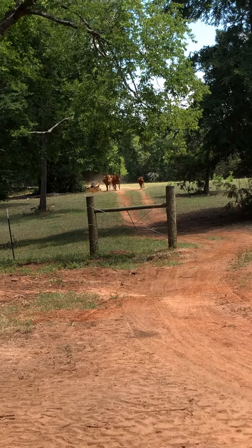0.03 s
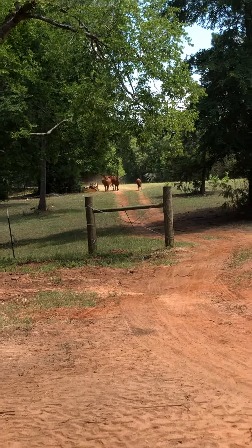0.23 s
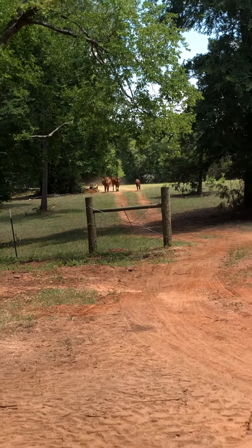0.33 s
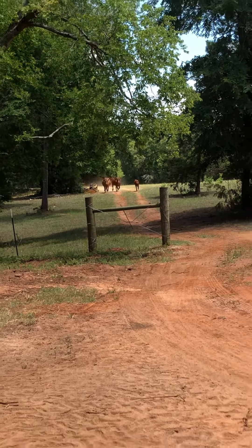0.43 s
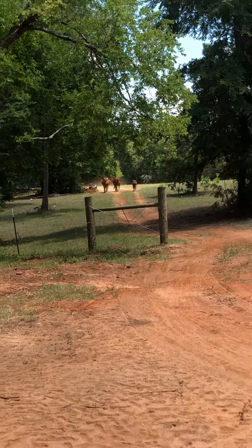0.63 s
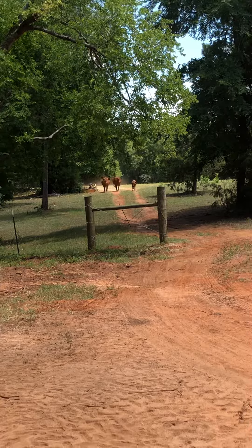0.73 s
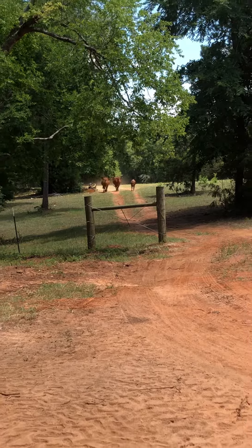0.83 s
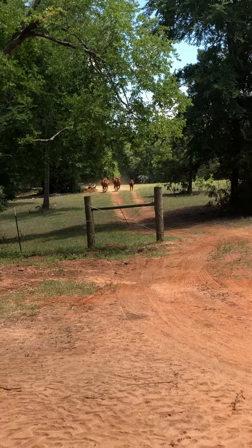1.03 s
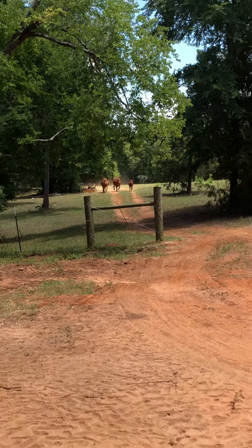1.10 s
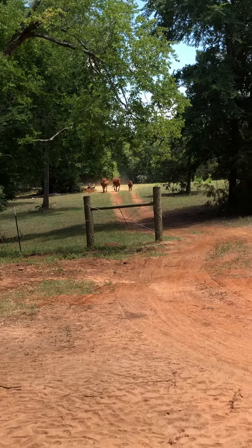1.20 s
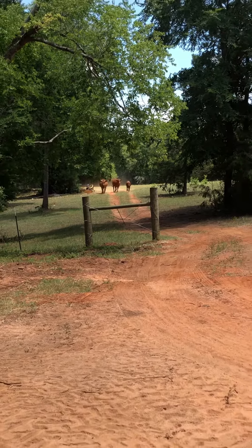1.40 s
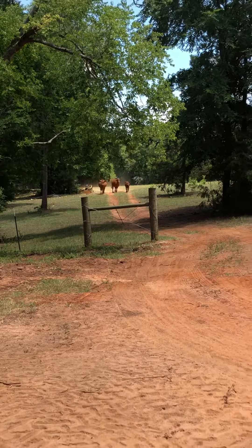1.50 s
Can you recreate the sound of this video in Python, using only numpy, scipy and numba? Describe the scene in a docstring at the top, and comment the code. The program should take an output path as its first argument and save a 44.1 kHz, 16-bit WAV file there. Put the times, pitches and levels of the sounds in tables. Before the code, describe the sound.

A single cow moo opens with a slow throaty rattle, swells and turns hoarse, flips to a thin high tone, then plunges into a short grunt; quiet open pasture, dull tree echoes, faint wind and insects.

```python
"""A slow rattle through a nearly shut mouth opens a cow's one moo: it opens, climbs, turns hoarse,
breaks into a thin falsetto and plunges to a last grunt. Chest voice: pulses and puffs through nose
and throat resonances. Falsetto: a few sine partials plus throat-rung overtones. Grunt: throat noise
and decaying modes. Behind, over dull echoes: dry noise ticks and rustle, filtered-noise wind and
insect hiss, a low hum of sines."""
import sys
import numpy as np
from scipy import signal
from scipy.fft import rfft, irfft
from scipy.io import wavfile
from scipy.ndimage import uniform_filter1d
from numba import njit

SR = 44100
rng = np.random.default_rng(int(sys.argv[2]) if len(sys.argv) > 2 else 0)


def persist_wave(psi):
    """Save psi, clipped to +-1, as 16-bit WAV."""
    counts = np.round(np.clip(psi, -1, 1) * 32767).astype(np.int16)
    wavfile.write(sys.argv[1], SR, np.atleast_2d(counts).T)


N = 68355
T = np.arange(N) / SR


def from_db(db):
    """Amplitude ratio of a level in dB."""
    return 10 ** (np.asarray(db) / 20)


def rms_one(x):
    """Scale to rms 1."""
    return x / np.sqrt(np.mean(x ** 2) + 1e-20)


def in_time(rows):
    """Each column of a curve, at every sample."""
    s, *columns = np.transpose(rows)
    return [np.interp(T, s, c) for c in columns]


def cut(x, hz, kind, order=2):
    """Butterworth filter."""
    safe_hz = np.clip(hz, 10, .45 * SR)
    return signal.sosfilt(signal.butter(order, safe_hz, kind, fs=SR, output="sos"), x + 1e-18)


def noise():
    """White noise of rms about 1."""
    return rng.standard_normal(N)


def drift(hz):
    """Low-passed noise of rms 1, taken after the filter has settled."""
    return rms_one(cut(rng.standard_normal(2 * N), hz, "low")[N:])


def fade(seconds, length_s):
    """Smooth step from 0 to 1, half way where seconds crosses zero."""
    return .5 + .5 * np.tanh(2 * seconds / length_s)


@njit
def two_pole(x, w, r):
    """Two-pole resonator: w is the centre in radians per sample, r the pole radius."""
    y = np.zeros(len(x))
    for i in range(2, len(x)):
        drive = (1 - r * r) / 2 * (x[i] - x[i - 2])
        y[i] = drive + 2 * r * np.cos(w[i]) * y[i - 1] - r * r * y[i - 2]
    return y


def resonate(x, hz, width_hz):
    """Resonance of peak gain 1 whose centre may move."""
    return two_pole(x, 2 * np.pi * hz / SR * np.ones(N), np.exp(-np.pi * width_hz / SR))


def even(x):
    """Hold the level near rms 1 over a few pulses."""
    power = uniform_filter1d(uniform_filter1d(x * x, size=1000), size=700)
    return x / np.sqrt(np.abs(power) + 1e-14)


# vocal-fold pulse rate: [t/s, f/Hz]
CHEST_PITCH = [(0, 93.75), (.045, 87.77), (.085, 88.42), (.202, 90.72), (.266, 83.96), (.298, 84),
               (.375, 89.9), (.45, 95.75), (.598, 113.1), (.724, 125), (.796, 133.2), (.836, 145.3),
               (.902, 151.1), (.945, 153.4), (.97, 170.4)]
# hoarseness: [t/s, pitch jitter/share, turbulence level/dB re pulses]
HOARSENESS = [(0, .035, -8), (.13, .02, -10), (.17, .003, -15), (.45, .003, -11), (.73, .004, -8),
              (.755, .022, 0), (.785, .008, -6), (.82, .014, -3), (.87, .014, -3), (.92, .006, -7),
              (.96, .02, -4)]
JITTER_LOW_HZ, JITTER_HIGH_HZ = 22.3, 83
PUFF_SHARPNESS, PUFF_LAG_RAD = 2.5, 0.68


def vocal_folds():
    """Jittered harmonic pulses; turbulence peaks once per pulse, a little late."""
    (hz,), (jitter, rasp_db) = in_time(CHEST_PITCH), in_time(HOARSENESS)
    wobble = jitter * rms_one(cut(drift(JITTER_HIGH_HZ), JITTER_LOW_HZ, "high"))
    phase = 2 * np.pi * np.cumsum(hz * (1 + wobble)) / SR
    pulses = rms_one(sum(np.cos(k * phase) for k in range(1, 60)))
    puffs = rms_one(noise() * np.exp(PUFF_SHARPNESS * np.cos(phase - PUFF_LAG_RAD)))
    return pulses, puffs, rasp_db


# mouth poses (shut, parted, wide open, rounded, strained, pinched): [t/s]
POSE_S = (.1, .22, .28, .5, .7, .9)
# nose resonance centre, one entry per pose: [f/Hz]
NOSE_POSE_HZ = (280.5, 210, 212, 206.7, 224, 223.23)
NOSE_WIDTH_HZ, NOSE_TOP_HZ = 115, 335.1


def nose(pulses):
    """Two equal gliding resonances in series, then a steep low-pass."""
    hz = np.interp(T, POSE_S, NOSE_POSE_HZ)
    rung = resonate(resonate(pulses, hz, NOSE_WIDTH_HZ), hz, NOSE_WIDTH_HZ)
    return even(cut(rung, NOSE_TOP_HZ, "low", order=10))


# throat resonances: [width/Hz, centre f/Hz per pose, level/dB per pose]
FORMANTS = [ (65.3, (555, 565, 541.7, 610, 644, 637.3), (-8.5, -10, -3, -1.5, 2.5, 3)),
            (156, (762, 770, 800, 765, 731.5, 728), (-5, -3, -6.5, -8.5, -4, -4)),
            (69.9, (1012, 900, 1017.7, 1040, 1014.4, 1042), (0, 0, 0, -1, 0, -1)),
            (44.5, (1270, 1171, 1282, 1323, 1299.3, 1310), (-16, -13, -1, -11, -18.5, -27.5)),
            (129, (1330, 1437, 1380, 1330, 1406, 1357), (-31.5, -19, -29.5, -21, -51, -26)),
            (64.8, (1560, 1614, 1556, 1570, 1576, 1578.4), (-6, -15, -8, -19, -5.5, -7.5)),
            (64.8, (2167, 1994, 1985, 1830, 1880, 1812), (-8, -2.5, -3, -9.5, -12.5, -10.5)),
            (185.5, (2460, 2520, 2300, 2291, 2280, 2480), (-26, -14, -10.5, -26, -23, -26)),
            (92.6, (3060, 2887, 2910, 2904, 2790, 2716), (-11.5, -21, -9, -16.5, -14.5, -17)),
            (83.3, (3870, 3430, 3520, 3440, 3540, 3300), (-11.5, -16, -16.5, -27, -21, -23))]
MOUTH_LOW_CUT_HZ, MOUTH_TOP_HZ = 462, 3890


def throat(x):
    """Parallel resonances gliding between poses; the top three share a sign, with notches between."""
    signs = [1, -1, 1, -1, 1, -1, 1, -1, -1, -1]
    out = np.zeros(N)
    for sign, (width_hz, pose_hz, pose_db) in zip(signs, FORMANTS):
        driven = x * from_db(np.interp(T, POSE_S, pose_db))
        out += sign * resonate(driven, np.interp(T, POSE_S, pose_hz), width_hz)
    return cut(cut(out, MOUTH_LOW_CUT_HZ, "high", order=8), MOUTH_TOP_HZ, "low", order=3)


# chest-voice effort: [t/s, nose level/dB, mouth level/dB]
EFFORT = [(0, -51, -55), (.045, -46, -50), (.082, -52, -57.5), (.09, -49.5, -49), (.125, -49.5, -48),
          (.15, -79, -57), (.163, -53, -43.5), (.25, -56, -41), (.275, -46, -39), (.33, -39, -37.5),
          (.45, -35.5, -36.5), (.6, -34, -38), (.72, -31, -37), (.805, -30, -39), (.88, -37, -42.5),
          (.948, -46, -41.5), (.97, -38.5, -43)]
# hiss of the puffs: [t/s, level/dB re mouth]
AIR = [(.1, -20), (.3, -40), (.55, -36), (.66, -30), (.78, -39), (.85, -27), (.97, -29)]
AIR_HZ, AIR_WIDTH_HZ = 6800, 3000
SHIMMER_DB, SHIMMER_HZ = 1, 50  # wander of pulse strength
GROUND_DB, GROUND_DELAY_S = -18.5, 0.00308  # bounce off the ground
START_S, START_FADE_S = 0.004, 0.036
BREAK_S, BREAK_FADE_S = .968, 0.005  # flip into falsetto


def chest_voice():
    """Vocal-fold pulses and puffs sound through nose and mouth until the voice breaks."""
    pulses, puffs, rasp_db = vocal_folds()
    nose_db, mouth_db = in_time(EFFORT)
    shimmering = pulses * from_db(SHIMMER_DB * drift(SHIMMER_HZ))
    mouth = even(throat(shimmering + from_db(rasp_db) * puffs))
    mouth = mouth + from_db(GROUND_DB) * np.interp(T - GROUND_DELAY_S, T, mouth)
    hiss = rms_one(resonate(resonate(puffs, AIR_HZ, AIR_WIDTH_HZ), AIR_HZ, AIR_WIDTH_HZ))
    air = from_db(in_time(AIR)[0]) * hiss
    voice = from_db(nose_db) * nose(pulses) + from_db(mouth_db) * (mouth + air)
    return voice * fade(T - START_S, START_FADE_S) * fade(BREAK_S - T, BREAK_FADE_S)


# falsetto: [t/s, f/Hz, partial 1 level/dB, partial 2 level/dB, partial 3 level/dB]
FALSETTO = [(.965, 553, -48, -59, -58), (.99, 560.8, -45.5, -53.5, -57), (1.024, 560.7, -47.5, -53.5, -60),
            (1.08, 545.5, -48.5, -52, -50.5), (1.104, 534, -42.5, -49, -53),
            (1.13, 504.2, -51.5, -44.5, -54), (1.165, 445.3, -54, -52.5, -57.5),
            (1.188, 388, -59, -51, -58), (1.208, 332.2, -41, -42.5, -38), (1.222, 282.4, -31, -43, -52.5),
            (1.233, 265.6, -29.5, -46, -68), (1.25, 198, -34.5, -93, -69)]
# drive of partials 4-11 into the throat: [t/s, level/dB each]
OVERTONES = [(.97, -60), (1.08, -46), (1.14, -46.5), (1.17, -46), (1.205, -40.5), (1.225, -51),
             (1.248, -47)]
FALSETTO_JITTER_SHARE, FALSETTO_JITTER_HZ, FALSETTO_FADE_S = 0.0075, 96.6, 0.012
OVERTONE_BLUR_RAD, OVERTONE_BLUR_HZ = 0.14, 300  # phase wobble, radians times partial number


def falsetto():
    """A thin tone holds, then plunges; overtones light up as they cross the throat resonances."""
    hz, *levels_db = in_time(FALSETTO)
    wobble = FALSETTO_JITTER_SHARE * drift(FALSETTO_JITTER_HZ)
    phase = 2 * np.pi * np.cumsum(hz * (1 + wobble)) / SR
    tone = np.sqrt(2) * sum(from_db(db) * np.sin(k * phase) for k, db in enumerate(levels_db, 1))
    blurred = phase + OVERTONE_BLUR_RAD * drift(OVERTONE_BLUR_HZ)
    upper = np.sqrt(2) * sum(np.sin(k * blurred) for k in range(4, 12))
    overtones = from_db(in_time(OVERTONES)[0]) * throat(upper)
    end_s = FALSETTO[-1][0]
    return (tone + overtones) * fade(T - BREAK_S, BREAK_FADE_S) * fade(end_s - T, FALSETTO_FADE_S)


# hoarse air through the throat: [t/s, level/dB]
EXHALE = [(.9, -95), (.965, -43), (1.0, -56), (1.16, -58.5), (1.21, -54), (1.28, -52.5), (1.3, -97),
          (1.36, -73)]
# last slack flaps of the vocal folds: [t/s, level/dB]
FLAPS = [(1.252, -44), (1.275, -43)]
# ringing modes of a flap: [f/Hz, level/dB re flap, t60/s]
FLAP_MODES = [(262.2, 7.5, 0.13), (612, -7, 0.12), (952, 1.5, 0.042), (1526, -4.5, 0.033),
              (1820, -18, 0.031), (2574, -3, 0.0069)]


def grunt():
    """Spent air rushes through the throat; two fold flaps each ring as decaying sines."""
    out = from_db(in_time(EXHALE)[0]) * rms_one(throat(noise()))
    for s, db in FLAPS:
        age = np.maximum(T - s, 0)
        for hz, mode_db, t60_s in FLAP_MODES:
            out += from_db(db + mode_db - 60 * age / t60_s) * np.sin(2 * np.pi * hz * age)
    return out


# distinct echoes off trunks and the tree line: [delay t/s, level/dB before the low-pass]
ECHOES = [(.042, -20), (0.073, -26.5), (0.106, -24)]
ECHOES_TOP_HZ = 595
TAIL_DB, TAIL_T60_S, TAIL_TOP_HZ, TAIL_DELAY_S = -13.5, 0.44, 2200, 0.017


def scatter(x):
    """A few dull echoes and a decaying-noise tail from the ground and the trees."""
    decay = (T > TAIL_DELAY_S) * from_db(-60 * T / TAIL_T60_S)
    tail = cut(noise() * decay, TAIL_TOP_HZ, "low")
    tail = tail / np.sqrt(np.sum(tail ** 2) * SR / (2 * TAIL_TOP_HZ))
    delayed = sum(from_db(db) * np.interp(T - s, T, x, left=0) for s, db in ECHOES)
    echoes = cut(delayed, ECHOES_TOP_HZ, "low")
    return echoes + from_db(TAIL_DB) * signal.fftconvolve(x, tail)[:N]


# dry ticks: [t/s, level/dB before TICK_TRIM_DB]
TICKS = [(0.0153, -37.5), (.088, -45), (0.1778, -42.5), (0.4391, -34.5), (1.371, -48.5), (1.4192, -38.5),
         (1.459, -44), (1.484, -53)]
TICK_TRIM_DB, TICK_DECAY_S, TICK_BAND_HZ = -7, 0.0025, [1080, 9720]
# dry rustle: [t/s, level/dB]
RUSTLE = [(0, -60), (.06, -59), (.13, -62), (.22, -65.5), (.7, -68.5), (1.1, -65.5), (1.55, -104)]
RUSTLE_BAND_HZ, GRAIN_DB, GRAIN_HZ = [5090, 12040], 2.24, 170


def ticks():
    """Exponentially decaying noise snaps over a grainy, level-modulated noise rustle."""
    bursts = np.zeros(N)
    for s, db in TICKS:
        bursts += from_db(db + TICK_TRIM_DB) * (T >= s) * np.exp(-np.abs(T - s) / TICK_DECAY_S)
    snaps = bursts * rms_one(cut(noise(), TICK_BAND_HZ, "band"))
    grainy = noise() * from_db(GRAIN_DB * drift(GRAIN_HZ))
    grains = rms_one(cut(grainy, RUSTLE_BAND_HZ, "band", order=1))
    return snaps + from_db(in_time(RUSTLE)[0]) * grains


# wind rumble: [t/s, level/dB]
WIND = [(0, -46), (.06, -51), (.13, -50.5), (.24, -50.5), (.38, -58), (.46, -55), (.54, -57), (.7, -53.5),
        (.83, -71.5), (1.0, -73), (1.24, -53), (1.35, -84), (1.55, -78)]
WIND_BAND_HZ = [45.6, 162]


def wind():
    """Low band of noise, rising and falling in level."""
    return from_db(in_time(WIND)[0]) * rms_one(cut(noise(), WIND_BAND_HZ, "band"))


# far hum: [t/s, level/dB]
HUM_LEVEL = [(0, -48), (.3, -56), (.7, -63), (.9, -63), (1.3, -69), (1.42, -59.5), (1.55, -61.5)]
# hum partials: [f/Hz, level/dB re hum]
HUM_PARTIALS = [(91, -4), (183, -16.5), (275, -13.5)]


def hum():
    """Low sines sharing a wavering clock, each drifting in level."""
    clock_s = T + np.cumsum(0.017 * drift(8)) / SR  # rate wanders by 1.7 % rms
    out = np.zeros(N)
    for hz, db in HUM_PARTIALS:
        out += np.sqrt(2) * from_db(db + 2 * drift(4.1)) * np.sin(2 * np.pi * hz * clock_s)
    return from_db(in_time(HUM_LEVEL)[0]) * out


# field spectrum with its insect band: [f/Hz, relative level/dB per Hz]
FIELD = [(30, -7), (90, 1.5), (270, 6), (420, -3.5), (1000, -9.5), (2000, -13.5), (3300, -9.5), (4100, -8),
         (4750, -5.5), (5100, -18.5), (8000, -16.5), (13000, -21.5), (15500, -27)]
FIELD_DB = -58.5  # overall rms


def field():
    """Steady noise shaped in frequency, with an insect hiss."""
    hz, db = np.transpose(FIELD)
    bin_hz = np.arange(N // 2 + 1) * SR / N
    colour = from_db(np.interp(np.log(bin_hz + 1), np.log(hz), db))
    return from_db(FIELD_DB) * rms_one(irfft(rfft(noise()) * colour, N))


def scene():
    """The cow and its echo in the pasture."""
    cow = chest_voice() + falsetto() + grunt()
    return (cow + scatter(cow) + ticks() + wind() + hum() + field())[None]


def record(dry):
    """Steep elliptic low-pass at 15750 Hz."""
    return signal.sosfilt(signal.ellip(10, .1, 70, 15750, fs=SR, output="sos"), dry)


dry = scene()
out = record(dry)
persist_wave(out)
```